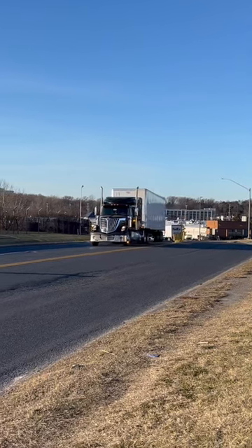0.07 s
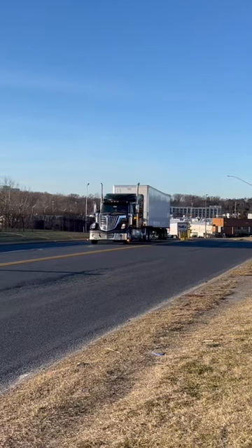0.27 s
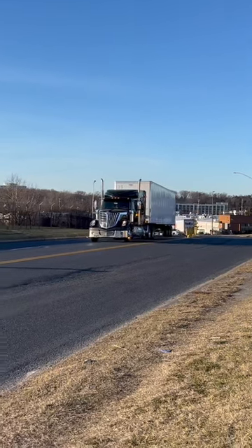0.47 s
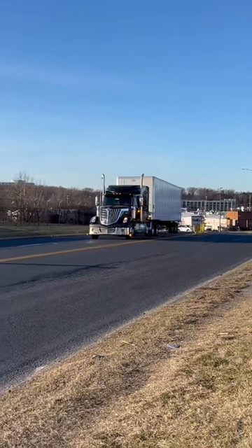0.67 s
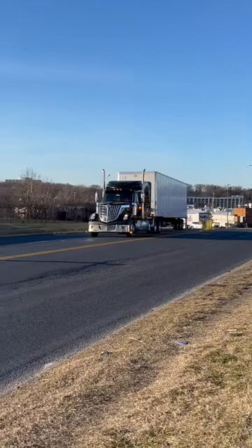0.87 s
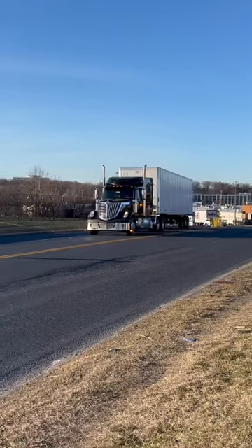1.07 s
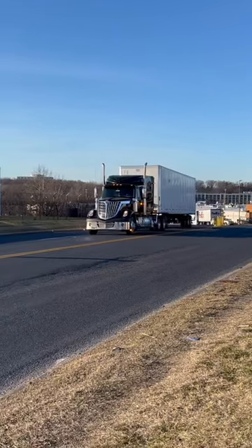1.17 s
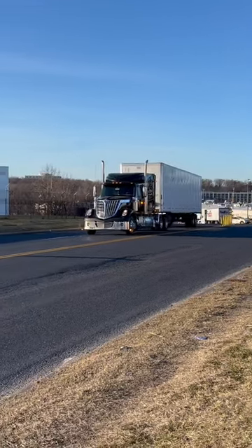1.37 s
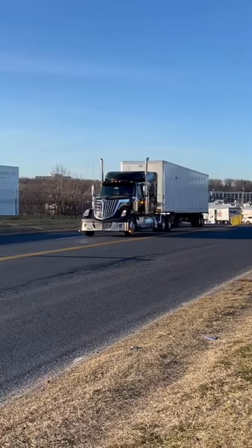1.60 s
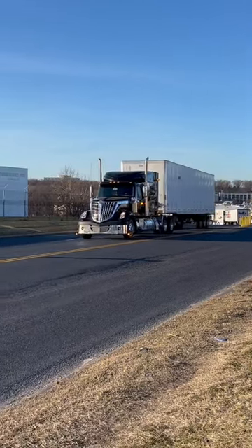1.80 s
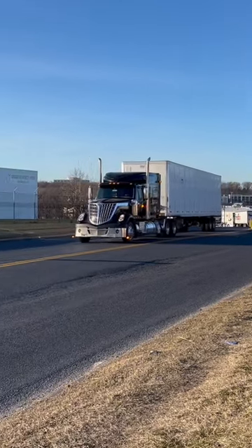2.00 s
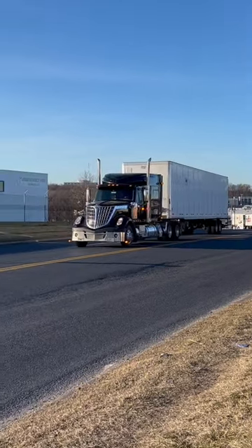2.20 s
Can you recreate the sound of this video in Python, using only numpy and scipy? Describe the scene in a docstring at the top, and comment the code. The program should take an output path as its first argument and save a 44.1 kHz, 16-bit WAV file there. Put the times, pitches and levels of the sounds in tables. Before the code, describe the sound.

Three brassy multi-toned truck horn blasts ring out and echo outdoors above road rumble and engine hum.

```python
"""Truck air horn at the roadside

A phone with two microphone ports stands at the roadside as a truck rolls towards it and sounds three
blasts on three trumpets: reeds at pipe pitch, with overtones, mixing tones and hissing air.
Buildings behind the truck return delayed echoes, the later one slightly flat, with a noise-like tail.
Tyres roar and sing as shaped noise with a narrow tread tone; the diesel hums as two unsteady tones.
Lumpy low noise is wind buffeting the ports; two short puffs of high noise rustle faintly."""
import sys
import numpy as np
from scipy import signal
from scipy.fft import rfft, irfft, next_fast_len
from scipy.io import wavfile
from scipy.ndimage import uniform_filter1d, map_coordinates

SR = 44100
rng = np.random.default_rng(int(sys.argv[2]) if len(sys.argv) > 2 else 0)


def ratio_of_db(decibels):
    """Turn decibels (scalar or array-like) into linear amplitude factors; 0 dB maps to 1."""
    return 10 ** (np.asarray(decibels, float) / 20)


def dump_mix(stems):
    """Bounce the given channels to the path in sys.argv[1] as a 16-bit WAV at rate SR."""
    frames = np.atleast_2d(stems).T  # one column per channel
    limited = np.clip(frames, -1, 1)  # hard clip at full scale
    pcm = np.round(limited * 32767).astype(np.int16)
    wavfile.write(sys.argv[1], SR, pcm)


N = 99225  # samples, 2.25 s


def unit(x):
    """Scaled to rms 1."""
    return x / np.sqrt(np.mean(x ** 2) + 1e-20)


def along(points, hz):
    """Value at hz between (frequency [Hz], value) points on a log axis."""
    f, v = np.transpose(points)
    return np.interp(np.log(hz + 1), np.log(f + 1), v)


def curves(rows):
    """One value per sample for each column after the time."""
    s, *columns = np.transpose(rows)
    return [np.interp(np.arange(N) / SR, s, column) for column in columns]


def wobble(rate):
    """A smooth random curve with rate knots a second."""
    return map_coordinates(rng.standard_normal(400), [np.arange(N) * rate / SR])


def filtered(x, response):
    """The sound x times a response of frequency."""
    size = next_fast_len(N + SR // 2)
    return irfft(rfft(x, size) * response(np.fft.rfftfreq(size, 1 / SR)), size)[..., :N]


def sides(pan_db):
    """Left and right gains for a left-right difference in dB."""
    return ratio_of_db(np.array([pan_db / 2, -pan_db / 2]))


def rush(spectrum, alike, patchy_db):
    """Shaped stereo noise of rms 1, with random gain patches and a set likeness between the ports."""
    z = signal.stft(rng.standard_normal((2, N)), nperseg=512)[2]
    patches = uniform_filter1d(rng.standard_normal(z.shape[1:]), size=5, axis=0)  # across frequency
    patches = uniform_filter1d(patches, size=10, axis=1)  # across time
    pair = signal.istft(z * ratio_of_db(patchy_db * unit(patches)), nperseg=512)[1][:, :N]

    def mid_side_gains(hz):
        angle = np.arccos(along(alike, hz)) / 2
        return ratio_of_db(along(spectrum, hz)) * [np.cos(angle), np.sin(angle)]

    mid, side = filtered(pair, mid_side_gains)
    return unit(np.array([mid + side, mid - side]))


# gusts on the ports: (time [s], level [dB])
GUSTS = [(0, -34), (.45, -28.5), (.62, -25), (.75, -26.5), (.9, -33.5), (1.06, -37.5), (1.12, -45),
         (1.42, -39), (1.82, -31.5), (1.92, -37), (2.25, -38.5)]
# relative spectrum of the buffeting: (frequency [Hz], density [dB per Hz])
BUFFET_SPECTRUM = [(24, -32), (40, 4.5), (145, -5), (319, -6), (377, -11.5), (713, -21), (1500, -38.5),
                   (1950, -50), (3300, -120)]
# eddies bursting on the ports: (time [s], level [dB], length [s])
EDDIES = [(0.339, -25.5, 0.015), (0.511, -24.5, 0.0055), (0.665, -22, 0.008), (.69, -20.5, 0.0095),
          (0.732, -27, .006), (0.779, -15, 0.0047), (0.817, -22, .005)]


def wind():
    """Turbulence on the ports: lumpy low buffeting, mostly different at each, with a few sharp eddies."""
    lumps = ratio_of_db(1.5 * wobble(24.96) + 3.14 * np.array([wobble(30), wobble(26.03)]))
    buffeting = rush(BUFFET_SPECTRUM, [(40, 0.57), (300, 0.39)], patchy_db=2.0)
    gusts = ratio_of_db(curves(GUSTS)[0]) * unit(lumps * buffeting)
    t = np.arange(N) / SR
    bursts = sum(ratio_of_db(db) * np.exp(-((t - s) / length) ** 2) for s, db, length in EDDIES)
    eddy_spectrum = [(40, -8.5), (100, -2), (300, -2.5), (900, -15.0), (2500, -32.5), (6000, -99)]
    return gusts + bursts * rush(eddy_spectrum, [(40, .7), (300, 0.18)], patchy_db=4.0)


# faint high rustles: (time [s], level [dB])
RUSTLES = [(2.02, -49), (2.185, -51)]


def rustles():
    """Short puffs of high noise with a bell-shaped envelope."""
    t = np.arange(N) / SR
    puffs = sum(ratio_of_db(db) * np.exp(-((t - s) / 0.011) ** 2) for s, db in RUSTLES)
    return puffs * rush([(3000, -42), (3900, 3), (4800, 4), (6000, -33)], [(4000, 0.67)], patchy_db=1)


# hum of the approaching engine: (time [s], level [dB])
HUM = [(0, -36), (.33, -30.5), (.8, -26.5), (1.2, -38.5), (1.5, -34), (1.8, -35), (2.25, -49)]
FIRING_HZ = 45.13  # mean firing rate


def diesel():
    """Cylinder firing gives a low tone and its octave, slightly unsteady in pitch and level."""
    phase = 2 * np.pi * np.cumsum(FIRING_HZ + 1.47 * wobble(8.16)) / SR
    tones = 1.3 * np.sin(phase) + 0.33 * np.sin(2 * phase)
    return ratio_of_db(curves(HUM)[0] + 1.6 * wobble(10)) * tones


# tyre roar at the roadside: (time [s], level [dB])
ROAR_LEVEL = [(0, -29.5), (.5, -32.5), (.9, -32), (1.3, -38.5), (1.7, -38), (2.25, -36.5)]
# relative spectrum of the roar: (frequency [Hz], density [dB per Hz])
ROAR_SPECTRUM = [(88, -30), (150, -0.5), (298, -13), (410, -18), (592, -3), (803, -6.5), (935, -9.5),
                 (2600, -19), (6170, -34.5), (12700, -50)]
# how alike the two ports hear it: (frequency [Hz], likeness [0 to 1])
ROAR_ALIKE = [(150, 0.77), (600, 0), (1400, 0.65), (3000, 0.38), (7000, 0), (13800, 0.76)]
# left-right balance, also used for the horn's air: (frequency [Hz], left over right [dB])
BALANCE = [(300, 1), (700, 1.5), (2300, -7), (7500, 1)]
# tread song: (frequency [Hz], width [Hz], level over the roar [dB])
TREAD_SONG = [(592.6, 22.6, -7.5)]
TREAD_HALVES_S = 0.89  # time at which the song is at half amplitude


def road():
    """Rolling tyres: broad roar with the narrow, fading song of the tread."""
    roar = rush(ROAR_SPECTRUM, ROAR_ALIKE, patchy_db=1.5)
    roar = filtered(roar, lambda hz: sides(along(BALANCE, hz)))
    song = 0
    for centre, width, db in TREAD_SONG:
        narrow = filtered(rng.standard_normal(N), lambda hz: 1 / (1 + ((hz - centre) / width * 2) ** 2))
        song = song + ratio_of_db(db) * unit(narrow)
    fade = 1 / (1 + (np.arange(N) / SR / TREAD_HALVES_S) ** 4)
    sway = ratio_of_db(.6 * wobble(6))
    return ratio_of_db(curves(ROAR_LEVEL)[0]) * sway * (roar + fade * song)


PORT_LAG_S = .0001


def left_first(x):
    """Spacing of the ports: a phase slope lets the left hear the sound a moment before the right."""
    return filtered(x, lambda hz: np.exp(1j * np.pi * hz * PORT_LAG_S * np.array([[1], [-1]])))


# echoes off the buildings: (delay [s], level [dB], pitch ratio [1], left over right [dB])
BUILDINGS = [(.115, -12, 1, 1.5), (.26, -25, 0.99, 10.5)]
# what the walls return: (frequency [Hz], gain [dB])
WALL_RETURN = [(430, -4.5), (600, -11), (820, 0), (1200, -10.5), (2200, -12.5), (2450, 0), (3000, -14)]
# diffuse tail of the street: (frequency [Hz], time to fall 60 dB [s])
STREET_T60 = [(300, 1), (3000, 0.98), (10000, 0.046)]
STREET_DB = -17


def street(x):
    """Late echoes, one lowered because the truck moves away from the walls, and a diffuse tail."""
    n = np.arange(N)
    echoes = 0
    for delay, db, ratio, pan_db in BUILDINGS:
        # slowed about 1.4 s, where the delay is exact
        source_n = (n - SR * (1.4 + delay)) * ratio + SR * 1.4
        echo = np.array([np.interp(source_n, n, channel) for channel in x])
        echoes = echoes + ratio_of_db(db) * sides(pan_db)[:, None] * echo
    echoes = filtered(echoes, lambda hz: ratio_of_db(along(WALL_RETURN, hz)))
    hz, t, z = signal.stft(rng.standard_normal((2, SR)), SR, nperseg=256)
    tail = signal.istft(z * ratio_of_db(-60 * t / along(STREET_T60, hz)[:, None]), SR, nperseg=256)[1]
    feed = x.mean(axis=0)[None] + echoes
    wet = signal.fftconvolve(feed, tail / np.linalg.norm(tail[0]), axes=1)[:, :N]
    return echoes + ratio_of_db(STREET_DB) * wet


SWELL_S = .045  # time constant of the slow parts


def late(push_db):
    """Pressure as the slow parts feel it: held back while it rises."""
    a = np.exp(-1 / (SR * SWELL_S))
    smooth = signal.lfilter([1 - a], [1, -a], ratio_of_db(push_db))
    return np.minimum(push_db, 20 * np.log10(smooth + 1e-4))


UPPER_DB, UPPER_DB_PER_OCT, UPPER_FLUTTER_DB = -30, -12.5, 8  # level at 4 kHz, slope, flutter


def upper(phase, hz, first, level_db):
    """The thin, restless overtones from order first up to about 13.5 kHz, falling by octave."""
    orders = np.arange(first, 13500 // hz.max())
    fall_db = UPPER_DB + UPPER_DB_PER_OCT * np.log2(orders * hz.mean() / 4000)

    def port():
        return sum(ratio_of_db(db + UPPER_FLUTTER_DB * wobble(19)) * np.sin(k * phase + k * k)
                   for k, db in zip(orders, fall_db))

    return ratio_of_db(level_db) * np.array([port(), port()])


# air pressure at the horn as the cord is pulled three times: (time [s], level under full [dB])
CORD_PRESSURE = [(0.927, -46), (0.957, -7.5), (0.99, -1.5), (1.05, -0.5), (1.138, -3), (1.18, -9.5),
                 (1.22, -15), (1.273, -26), (1.308, -9.5), (1.355, -3.5), (1.45, 0), (1.582, -1),
                 (1.62, -10), (1.66, -17.5), (1.697, -30), (1.728, -8.5), (1.79, -1.5), (1.858, 0),
                 (1.889, -8), (1.929, -23.5), (1.98, -68)]
BITE, BITE_HZ = 1.79, 3100  # a sudden rush of air lifts overtones above this: dB per dB of rush
JITTER_RAD, JITTER_PER_S = 0.13, 60  # unsteady phase: scale, knots a second
FLUTTER_DB, FLUTTER_PER_S, PORTS_DIFFER = 1.1, 16, .7  # scale, knots a second, share differing by port


def trumpet(rows, tones, reed, lead):
    """A reed beats at its pipe's pitch; overtones need more pressure, and partials flutter in moving air."""
    hz, first_db, over_db, pan_db = curves(rows)
    lag, follows, steeper, sag = reed
    push_db, = curves([(s + lag, db) for s, db in CORD_PRESSURE])
    rush_db = push_db - late(push_db)
    phase = 2 * np.pi * np.cumsum(hz * (1 + sag * push_db)) / SR + JITTER_RAD * wobble(JITTER_PER_S)

    def flutter(k):
        ports = np.array([wobble(FLUTTER_PER_S), wobble(FLUTTER_PER_S)])
        return ratio_of_db(FLUTTER_DB * np.sqrt(k) * (wobble(FLUTTER_PER_S) + PORTS_DIFFER * ports))

    # the fundamental, its phase leading at the left port
    level = ratio_of_db(first_db + follows * push_db) * sides(pan_db)
    out = level * flutter(1) * np.sin([phase + lead / 2, phase - lead / 2])
    for k, db, side_db in tones:
        bite_db = BITE * (k * hz > BITE_HZ) * rush_db
        level = ratio_of_db(over_db + db + (follows + steeper * k) * push_db + bite_db)
        out = out + level * sides(side_db)[:, None] * flutter(k) * np.sin(k * phase + k * k)
    out = out + upper(phase, hz, len(tones) + 2, over_db + 2.06 * late(push_db))
    sounding = np.clip((push_db + 44) / 8, 0, 1)  # silent at 44 dB under full pressure
    return np.sqrt(2) * sounding * out, phase


# each trumpet at full pressure as the truck moves:
# (time [s], pitch [Hz], fundamental [dB], overtones [dB], fundamental left over right [dB])
LOW_TRUMPET = [(.985, 444, -36, -31, 5), (1.05, 434.8, -30.5, -26.5, 4), (1.16, 435.4, -28, -23.5, 5),
               (1.36, 436.2, -52.5, -21.5, -11), (1.6, 435.6, -35, -26, 7.5), (1.762, 436.9, -31.5, -21, 0),
               (1.9, 432.6, -26.5, -27.5, 10)]
MIDDLE_TRUMPET = [(0.982, 576.7, -21.5, -25, -15), (1.048, 573, -27.5, -20, -16),
                  (1.159, 572.6, -24.5, -15.5, -15.5), (1.331, 575.5, -21.5, -16.5, -7),
                  (1.6, 572.2, -25, -18.5, -1), (1.75, 576.2, -18, -15, -2.5),
                  (1.901, 571.7, -20, -29, 1.5)]
HIGH_TRUMPET = [(0.972, 821, -14.5, -24.5, -4), (1.06, 826.7, -20, -19.5, -5.5),
                (1.158, 821, -19.5, -17, -8), (1.329, 823, -17, -22.5, 0), (1.431, 824, -25, -27.5, -3),
                (1.501, 822, -20.5, -25, 5.5), (1.599, 816.8, -19.5, -25.5, 8.5), (1.7, 811, -22, -23, 3),
                (1.77, 822, -20.5, -24, 6.5), (1.87, 817.8, -14.5, -33, -2.5)]
# overtones of each trumpet: (multiple of pitch [1], level [dB], left over right [dB])
LOW_OVERTONES = [(2, -8.5, -5), (3, -0.5, -4.5), (4, -18, -7), (5, -12.5, 5), (6, -23, -20)]
MIDDLE_OVERTONES = [(2, -3, -6), (3, -4, -7), (4, -6, -14), (5, -17.5, -18), (6, -33, -22.5)]
HIGH_OVERTONES = [(2, -1, -10.5), (3, -5, -6), (4, -25.5, -14)]
# phase lead of the left port, shifting as the truck moves:
# (time [s], low [rad], middle [rad], high [rad])
LEFT_LEAD = [(1.06, .3, 4.5, -0.058), (1.45, .3, 1.02, 0.76), (1.82, 0.35, -0.1, -1.48)]
# tones mixed in the air line shared by two reeds: (multiple of low [1], multiple of middle [1], level [dB])
MIXING_TONES = [(2, 1, -30.5), (1, 2, -29)]
# relative spectrum of the escaping air: (frequency [Hz], density [dB per Hz])
AIR_SPECTRUM = [(500, -54), (1000, -16), (1500, -6), (2400, 1.5), (3500, -12.5), (7000, -17), (9000, -33),
                (14300, -29)]
# how each reed answers the pressure:
# (lag [s], fundamental [dB per dB], added per overtone [dB per dB], pitch share lost [1 per dB])
LOW_REED, MIDDLE_REED = (0.027, 0.5, 0.3, .0002), (0.0083, 0.76, 0.38, .0001)
HIGH_REED = (0.00066, 0.8, 0.16, .0006)
AIR_DB, AIR_GROWS, AIR_PULSED = -30.5, 0.75, 0.32  # level, dB per dB of pressure, chop by each reed


def horn():
    """Three reeds on compressed air, with the mixing tones of two and the hiss of air they chop."""
    low_lead, middle_lead, high_lead = curves(LEFT_LEAD)
    low_sound, low = trumpet(LOW_TRUMPET, LOW_OVERTONES, LOW_REED, low_lead)
    middle_sound, middle = trumpet(MIDDLE_TRUMPET, MIDDLE_OVERTONES, MIDDLE_REED, middle_lead)
    high_sound, high = trumpet(HIGH_TRUMPET, HIGH_OVERTONES, HIGH_REED, high_lead)
    push_db, = curves(CORD_PRESSURE)
    mixed = sum(ratio_of_db(db + 1.5 * wobble(FLUTTER_PER_S)) * np.sin(a * low + b * middle)
                for a, b, db in MIXING_TONES)
    mixed = ratio_of_db(2.06 * push_db) * sides(5.5)[:, None] * mixed
    chopped = 1 + AIR_PULSED * (np.sin(low) + np.sin(middle) + np.sin(high))
    hiss = rush(AIR_SPECTRUM, [(1000, 0.25), (5000, 0.1), (13000, 0.81)], patchy_db=0.5)
    air = ratio_of_db(AIR_DB + AIR_GROWS * late(push_db)) * chopped * hiss
    air = filtered(air, lambda hz: sides(2 * along(BALANCE, hz)))
    return low_sound + middle_sound + high_sound + mixed + air


def scene():
    """Everything at the two microphone ports."""
    blasts = horn()
    return blasts + street(blasts) + left_first(road() + wind() + diesel()) + rustles()


def top_cut(x):
    """Nothing passes above the cut-off."""
    return signal.sosfilt(signal.butter(12, 14430, fs=SR, output="sos"), x)


LOW_CUT_HZ = 42.3
CEILING = .97  # amplitude the peaks bend towards


def record(dry):
    """The phone cuts the lowest bass and rounds off the highest peaks."""
    mix = filtered(dry, lambda hz: 1 / (1 + (LOW_CUT_HZ / (hz + 1)) ** 8))
    mix = mix / (1 + np.abs(mix / CEILING) ** 8) ** (1 / 8)
    return top_cut(mix)


dry = scene()
out = record(dry)
dump_mix(out)
```